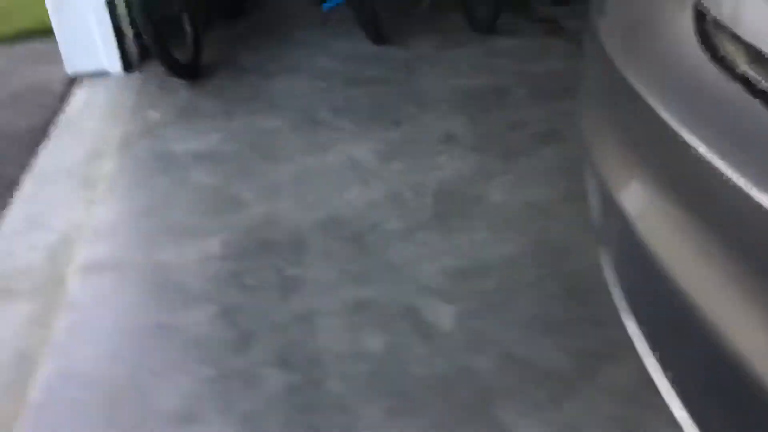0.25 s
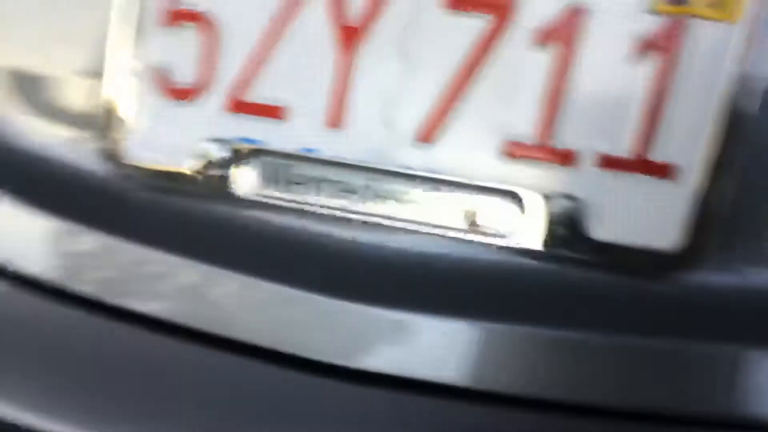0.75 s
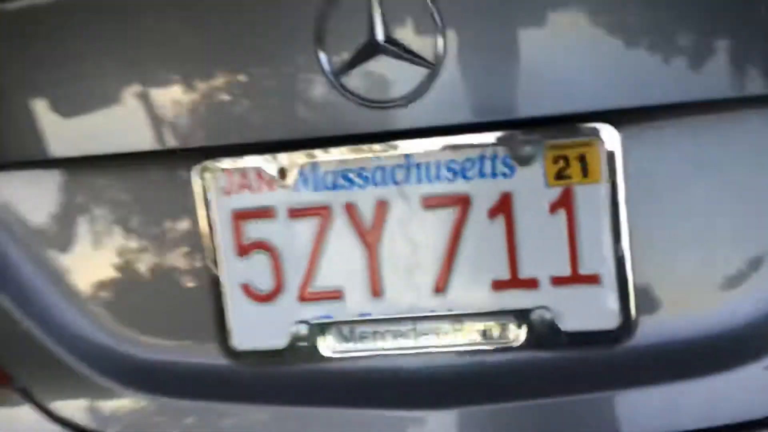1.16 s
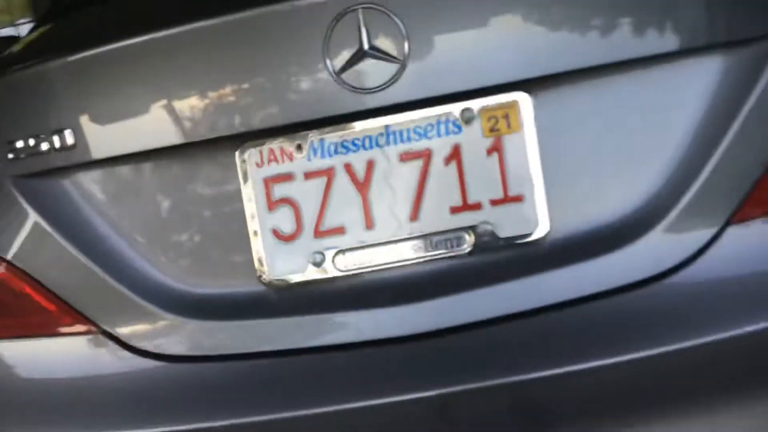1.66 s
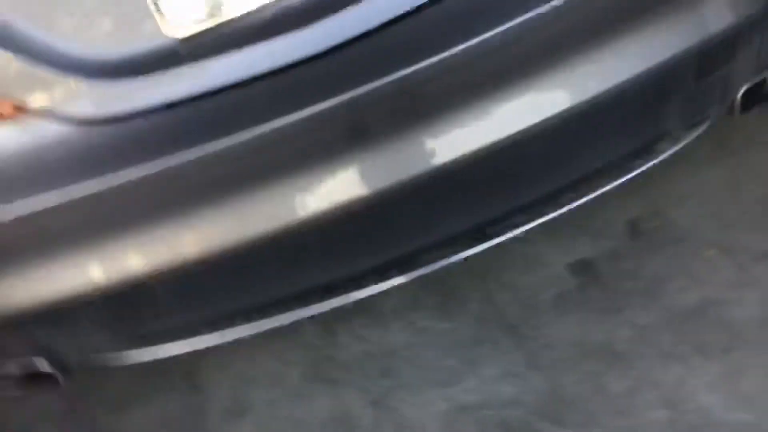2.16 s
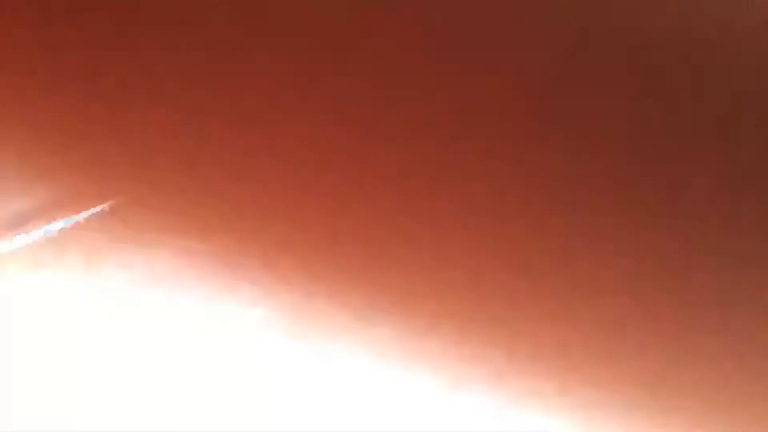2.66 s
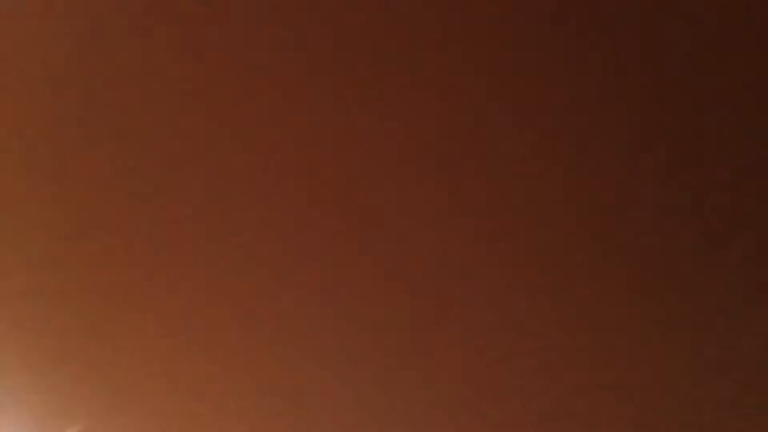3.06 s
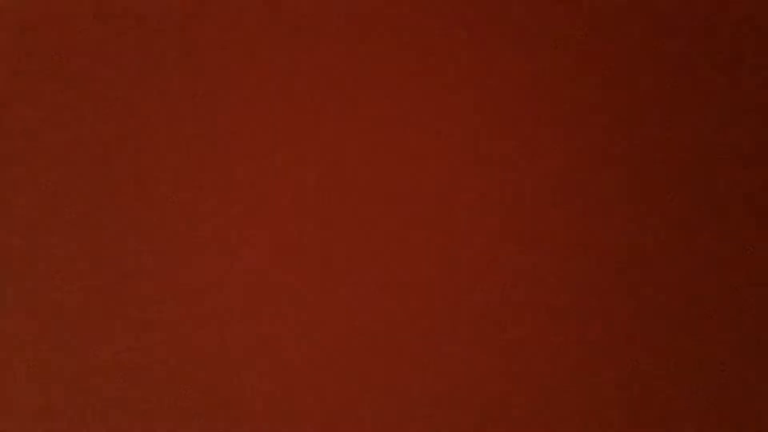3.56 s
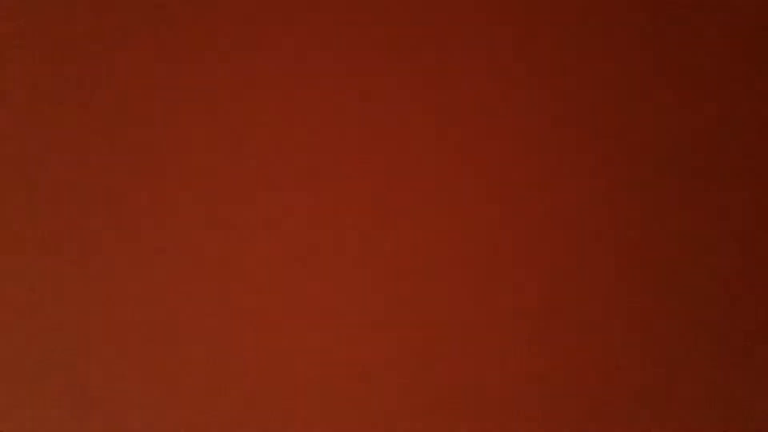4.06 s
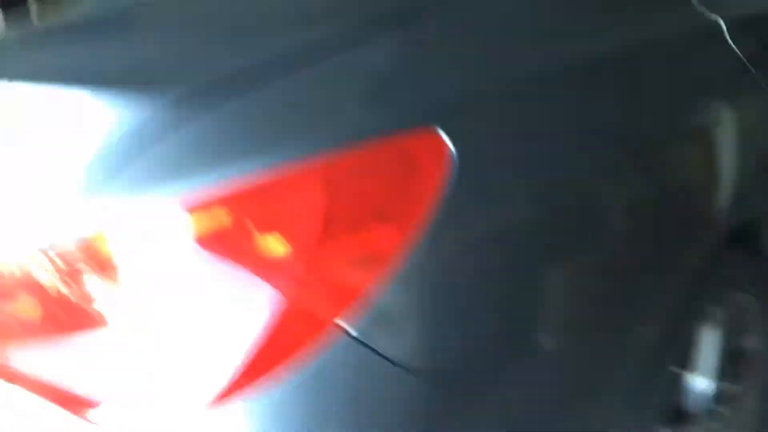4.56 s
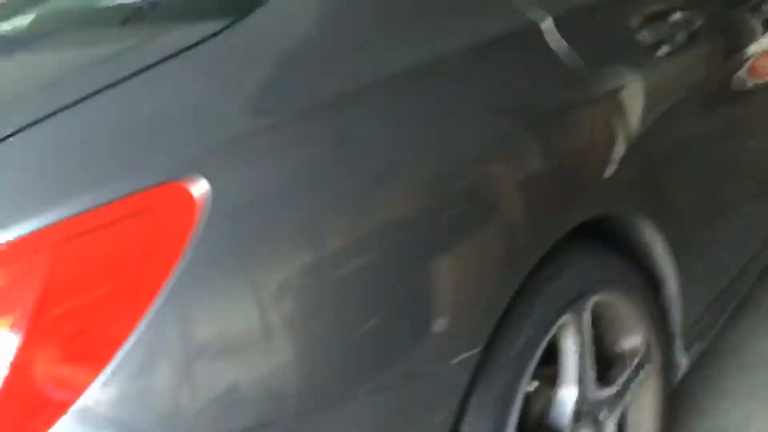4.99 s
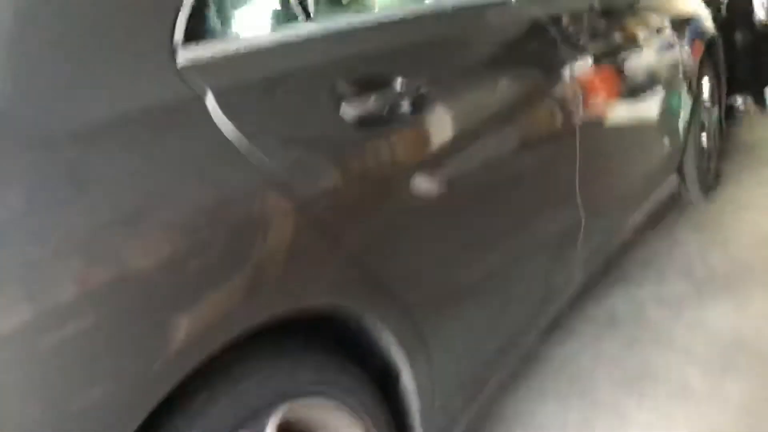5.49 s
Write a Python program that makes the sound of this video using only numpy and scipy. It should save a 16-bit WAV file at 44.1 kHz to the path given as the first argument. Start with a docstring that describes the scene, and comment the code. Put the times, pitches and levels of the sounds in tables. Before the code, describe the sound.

A faint hollow hinge rub leads into a car trunk lid slamming at about half a second: sharp metal latch clack, deep body thud and a quick rattle of loose trim. The garage rings briefly. Afterwards, a hand shifts on the handheld microphone, giving close, quiet rasps, low bumps and small plastic ticks over a low hush.

```python
"""Trunk lid slammed in a garage

A car's trunk lid swings down on rubbing hinges and slams: filtered noise bursts for the latch, dying
sines for the panels and body, fainter bursts for loose trim, and a noise tail for the garage around it.
Right at the microphone, mostly after the slam, the hand holding the camera shifts its grip: fingers and
palm are showers of tiny slips, bumps are low cycles falling in pitch, ticks are damped bursts. Still air
lies below.
"""
import sys
import numpy as np
from scipy import signal
from scipy.fft import next_fast_len
from scipy.io import wavfile
from scipy.ndimage import uniform_filter1d

SR = 44100
rng = np.random.default_rng(int(sys.argv[2]) if len(sys.argv) > 2 else 0)


def output_pcm(signal):
    """Save a mono or channel-first signal as 16-bit PCM at the path in sys.argv[1].

    Samples are clipped to [-1, 1] before scaling.
    """
    pcm = np.clip(np.atleast_2d(signal).T, -1, 1) * 32767
    wavfile.write(sys.argv[1], SR, np.round(pcm).astype(np.int16))


N = 252693
TIME = np.arange(N) / SR  # s

# the lid's weight landing on the body, and its rebounds: start_s, relative level_db
LANDINGS = [(0.46, -2.5), (0.497, 5), (0.603, -6.5)]


def amp(db):
    """Decibels to gain."""
    return 10 ** (np.asarray(db) / 20)


def evened(x):
    """Scales to rms 1."""
    return x / np.sqrt(np.mean(x ** 2) + 1e-20)


def read(points, hz):
    """Reads a table along a log-frequency axis."""
    f, value = np.transpose(points)
    return np.interp(np.log(hz + 1), np.log(f + 1), value)


def add(mix, s, sound):
    """Mixes a sound in at time s."""
    part = mix[max(round(s * SR), 0):][:len(sound)]
    part += sound[:len(part)]


def level(rows):
    """Gain over time from rows of time and dB."""
    s, db = np.transpose(rows)
    return amp(np.interp(TIME, s, db))


def colour(x, points, tilt_db=0):
    """Causal filter with the given spectrum, tilted by tilt_db per octave about 1.5 kHz."""
    size = next_fast_len(len(x) + 4096)
    hz = abs(np.fft.fftfreq(size, 1 / SR))
    tilt = tilt_db * np.log2(np.maximum(hz, 300) / 1500)  # level below 300 Hz
    log_gain = np.log(amp(read(points, hz) + tilt))
    response = np.exp(np.conj(signal.hilbert(log_gain)))  # minimum phase
    return np.fft.ifft(np.fft.fft(x, size) * response).real[:len(x)]


def wander(x, depth_db):
    """Narrow patches of the spectrum swell and fade, as when a contact keeps moving."""
    z = signal.stft(x, nperseg=1024, noverlap=768)[2]
    patches = uniform_filter1d(rng.standard_normal(z.shape), size=4, axis=0)
    patches = evened(uniform_filter1d(patches, size=9, axis=1))
    return signal.istft(z * amp(depth_db * patches), nperseg=1024, noverlap=768)[1][:len(x)]


def resonate(x, hz, width_hz):
    """One resonance whose centre may move: shift down to zero, smooth, shift back."""
    turn = np.exp(2j * np.pi * np.cumsum(hz * np.ones(len(x))) / SR)
    r = np.exp(-np.pi * width_hz / SR)
    return (turn * signal.lfilter([1 - r], [1, -r], x / turn)).real


def ring(modes):
    """Dying sines, one for each mode, with alternating sign."""
    t = TIME[:SR]
    out = np.zeros(SR)
    for k, (hz, db, t60) in enumerate(modes):
        out += (-1) ** k * amp(db - 60 * t / t60) * np.sin(2 * np.pi * hz * t)
    return out


def strike(crack_t60, clatter_db, clatter_t60, rise_s, contact_db):
    """One sharp contact, then a crack of dense noise that dies into a clatter; each strike differs."""
    t = TIME[:SR // 3]
    decay = amp(-60 * t / crack_t60) + amp(clatter_db - 60 * t / clatter_t60)
    shape = decay * (1 - np.exp(-t / rise_s))
    sound = shape * evened(wander(rng.standard_normal(len(t)), depth_db=3.5))
    add(sound, rise_s, [amp(contact_db)])  # a single-sample click
    return sound


def friction(points, per_s, spread_db, flutter_db, patchy_db):
    """Many tiny slips of uneven size, coming in clumps, coloured by what they shake."""
    slips = rng.choice([-1, 1], N) * (rng.random(N) < per_s / SR)
    slips = slips * amp(spread_db * np.minimum(rng.exponential(1, N), 4))
    clumps = uniform_filter1d(rng.standard_normal(N), size=400)
    clumps = evened(uniform_filter1d(clumps, size=300))
    return evened(colour(wander(slips, patchy_db) * amp(flutter_db * clumps), points))


def latch(panel_t60=0.47, spread_s=0.032):
    """Blows on steel, each coloured by the part it lands on; the strongest sets the panels ringing."""
    # seal, striker and latch meeting: start_s, relative level_db, hardness_db_per_octave, part_hz
    blows = [(0.367, -26.5, -7, 888), (0.451, -23.5, -6.5, 769), (0.459, -19.5, -7.5, 942),
             (0.464, -15.5, -2, 710), (0.474, -8.5, -0.5, 1304), (0.479, 3.5, -1.5, 2300),
             (0.485, -9.5, -3.5, 1284), (0.494, -6, -3.5, 790), (0.510, -3.5, 3, 3780),
             (0.517, -2.5, -2.5, 940), (0.534, -8.5, -2, 1300), (0.539, -4.5, 0, 1295),
             (0.546, -1.5, 0.1, 3880)]
    # colour of a blow on steel: frequency_hz, level_db
    steel = [(60, -19.5), (170, -22.5), (245, -1), (400, -2), (490, -4), (750, 2.5), (1050, -5),
             (1300, 1.5), (1700, -6), (2900, -7.5), (4500, -9), (7000, -19), (11000, -21), (16000, -26)]
    # ringing of the lid's panels: pitch_hz, relative level_db
    panel_modes = [(244, 5), (338, 6), (411, 3), (658, -3), (727, 3), (826, 2), (860, -2), (893, -3),
                   (973, -3), (1126, 1), (1180, -6), (1270, -3), (1292, -1), (1331, 0), (2574, -8),
                   (4171, -7), (4760, -13)]
    out = np.zeros(N)
    for s, db, hardness_db, hz in blows:
        blow = strike(crack_t60=0.062, clatter_db=-13, clatter_t60=0.18, rise_s=0.0006, contact_db=14.5)
        blow = colour(blow, steel, hardness_db)
        part = resonate(blow, hz, 0.38 * hz)
        add(out, s, amp(db - 8) * (blow + amp(-4.5) * part))
    s, db, *_ = max(blows, key=lambda row: row[1])
    panels = ring([(hz, mode_db, panel_t60) for hz, mode_db in panel_modes])
    spreading = 1 - np.exp(-TIME[:SR] / spread_s)
    add(out, s, amp(db - 34) * panels * spreading)
    return out


def boom(rise_s=0.011, thud_t60=0.22):
    """The lid squeezes the seal and the trapped air: a dull thud and the low modes of the body."""
    # the body and the air in the trunk: pitch_hz, relative level_db, t60_s
    body_modes = [(59, 3.5, 0.33), (79.5, -5, 0.88), (90, -8, 0.99), (118.6, 7, 0.31), (158.4, -11.5, 0.17),
                  (239.7, -9.5, 0.22)]
    # frequency_hz, level_db
    dull = [(25, -54.5), (55, 10.5), (130, 4.5), (280, -3.5), (450, -11), (1200, -60.5)]
    t, out = TIME[:SR], np.zeros(N)
    for s, db in LANDINGS:
        thud = evened(colour(rng.standard_normal(SR), dull)) * amp(-60 * t / thud_t60)
        body = amp(-31) * ring(body_modes) + amp(-17) * thud
        add(out, s, amp(db) * body * (1 - np.exp(-t / rise_s)))
    return out


def trim():
    """The number plate and trim chatter against the shaking lid: a run of short strikes."""
    # loose parts knocking: start_s, relative level_db, hardness_db_per_octave
    rattles = [(0.569, -10, -7), (0.582, -8.5, 3.5), (0.600, -11, 1), (0.613, -17, 0.5),
               (0.643, -12.5, 1.5), (0.651, -21, -2), (0.677, -12.5, 1.5), (0.709, -19, 0),
               (0.7412, -14, 0.5), (0.772, -30, -1), (0.804, -24, -0.5), (0.838, -30, 2),
               (0.864, -24.5, -.5), (0.896, -27.5, -1), (0.93, -32, -4.5), (0.959, -32.5, -3.5)]
    # colour of the loose parts: frequency_hz, level_db
    trim_colour = [(100, -3), (250, -2.5), (380, -4.5), (520, -8), (780, 7), (1050, 0.5), (1330, -2),
                   (1600, -7.5), (2500, -7), (3200, -8), (4300, -11.5), (5500, -14), (7000, -27),
                   (16000, -34)]
    out = np.zeros(N)
    for s, db, hardness_db in rattles:
        knock = strike(crack_t60=0.034, clatter_db=-14, clatter_t60=0.33, rise_s=0.00071, contact_db=11.5)
        add(out, s, amp(db - 9.5) * colour(knock, trim_colour, hardness_db))
    return out


def hinge(sing_hz=705, sing_width_hz=48):
    """The hinges rub and sing hollowly as the lid comes down, and stop when it lands."""
    # the lid swinging on its hinges: time_s, relative level_db
    swing = [(0, -42), (0.06, -73), (0.13, -81), (0.17, -55.5), (0.3, -44.5), (0.362, -45), (0.372, -36),
             (0.41, -44.5), (0.44, -46.5)]
    # colour of the rubbing: frequency_hz, level_db
    hinge_colour = [(60, -29.5), (190, 2.5), (300, -8.5), (480, -11.5), (615, -2), (760, -6), (850, -9.5),
                    (1150, -9.5), (1600, -19.5), (2700, -23.5), (6000, -41.5), (16000, -51)]
    rub = friction(hinge_colour, per_s=4500, spread_db=2.0, flutter_db=1.0, patchy_db=1.0)
    sing = resonate(rng.standard_normal(N), sing_hz, sing_width_hz)
    sing = evened(resonate(sing, sing_hz, sing_width_hz))
    moving = TIME < LANDINGS[0][0]
    return level(swing) * moving * (amp(-3.0) * rub + amp(-5) * sing)


def stroke(length_s, fastest):
    """A finger lands, speeds up, slows and lifts: its speed, and the loudness that follows it."""
    land_s, lift_s = 0.004, 0.016
    edge_speed, arch = 0.23, 1.85  # share of top speed at both ends; sharpness of the arch between
    t = TIME[:round((length_s + lift_s) * SR)]
    phase = np.interp(t / length_s, [0, np.clip(fastest, 0.05, 0.95), 1], [0, 0.5, 1])
    speed = edge_speed + (1 - edge_speed) * abs(np.sin(np.pi * phase)) ** arch
    touch = np.minimum(t / land_s, 1) * np.minimum((t[-1] - t) / lift_s, 1)
    return speed, speed * touch


def fingers(hollow_growth=0.78, scrape_width_hz=1100, scrape_glide=0.57, rest_db=-70.5):
    """Sliding skin rasps and fizzes, with a scrape that rises with speed; gentle strokes sound hollower."""
    # finger strokes over the case: start_s, length_s, fastest point as a share of the length,
    # relative rasp level_db, fizz_db relative to the rasp, scrape pitch_hz at top speed
    strokes = [(0.0, 0.15, 0.51, -57.5, -7, 3220), (0.17, 0.099, 0.45, -50, -8.5, 2900),
               (0.753, 0.12, 0.29, -59, -2, 3070), (1.07, 0.19, 0.32, -70.5, -4, 3500),
               (1.216, 0.13, 0.88, -66, -9.5, 2500), (1.593, 0.048, 0.29, -65.5, -7, 3700),
               (1.787, 0.097, 0.57, -69.5, -8, 2500), (1.911, 0.066, 0.48, -51, -12.5, 1786),
               (2.0, 0.17, 0.65, -45, -4.5, 1250), (2.135, 0.14, 0.76, -45.5, -6, 895),
               (2.236, 0.073, 0.93, -41.5, -21, 3100), (2.324, 0.17, 0.17, -66.5, -10, 3020),
               (2.598, 0.17, 0.72, -45, -11.5, 1860), (2.773, 0.25, 0.48, -59.5, -17, 1200),
               (3.122, 0.096, 0.6, -50, -10, 4200), (3.212, 0.15, 0.1, -66.5, -6, 3000),
               (3.493, 0.092, 0.89, -52.5, -18, 1500), (3.576, 0.072, 0.36, -54, -12, 1600),
               (3.625, 0.17, 0.13, -62, -32, 2430), (3.784, 0.2, 0.26, -64.5, -12, 2430),
               (3.982, 0.11, 0.093, -61.5, -9, 2540), (4.106, 0.11, 0.15, -50.5, -18, 2400),
               (4.247, 0.074, 0.82, -55, -5.5, 1200), (4.348, 0.11, 0.36, -47, -12, 2850),
               (4.447, 0.15, 0.42, -41, -8, 2650), (4.683, 0.053, .4, -64, -12, 2000),
               (4.777, 0.27, 0.41, -68.5, -13, 3400), (5.183, 0.058, 0.28, -63.5, -2, 2780),
               (5.234, 0.12, 0.14, -55, -11, 2880), (5.426, 0.072, 0.73, -62, -20, 1200),
               (5.655, 0.041, 0.71, -44.5, -12.5, 3280), (5.687, 0.067, .3, -60, -0.5, 3070)]
    # colours of the rasp, the hollow rub and the fizz: frequency_hz, level_db
    rasp_colour, hollow_colour, fizz_colour = [(300, -25), (700, 0), (1200, 2), (1800, -2), (2800, -1),
                                               (3600, -1.5), (4700, -5), (6200, -12.5), (7500, -16.5),
                                               (10000, -24.5)], [(150, -26.5), (350, -2), (480, -5.5),
                                                             (650, -0.5), (900, -16), (1400, -15),
                                                             (2500, -21.5), (6000, -53)], [(4000, -7), (6500, -6),
                                                                             (7700, -5), (8600, -1.5),
                                                                             (11000, -6.5), (16000, -12)]
    scrape_colour = [(300, -6.5), (700, -1.5), (4500, -1.5), (8000, -18.5)]
    rasp_gain, fizz_gain, pitch_sum = np.zeros((3, N))
    for s, length_s, fastest, db, fizz_db, hz in strokes:
        speed, loudness = stroke(length_s, fastest)
        add(rasp_gain, s, amp(db) * loudness)
        add(fizz_gain, s, amp(db + fizz_db) * loudness)
        add(pitch_sum, s, amp(db) * loudness * hz * speed ** scrape_glide)
    scrape_hz = pitch_sum / (rasp_gain + 1e-12)  # where strokes overlap, the louder weighs more
    slips = friction(scrape_colour, per_s=2200, spread_db=1.5, flutter_db=0.0, patchy_db=4.0)
    scrape = amp(-1.0) * rasp_gain * evened(resonate(slips, scrape_hz, scrape_width_hz))

    rub_gain = rasp_gain + amp(rest_db)  # the grip is never quite still
    rasp = friction(rasp_colour, per_s=11000, spread_db=3.5, flutter_db=2.2, patchy_db=2.5)
    rasp = amp(-3.5) * rub_gain * rasp
    hollow = friction(hollow_colour, per_s=1600, spread_db=4.5, flutter_db=-2.0, patchy_db=5.0)
    hollow = amp(-14.5) * rub_gain ** hollow_growth * hollow
    fizz = friction(fizz_colour, per_s=30000, spread_db=4.0, flutter_db=1.7, patchy_db=2.5)
    fizz = amp(-2.5) * fizz_gain * fizz
    return rasp + scrape + hollow + fizz


def bumps(start=1.95, end=0.67, fall_cycles=0.91, swell_cycles=0.79, flex=0.491, flex_db=-15):
    """Each bump gives a few low cycles; the small microphone's bass cut smears them into a falling pitch;
    the case flexes back slower."""
    # fingers bumping the case: start_s, relative level_db, nominal pitch_hz (start, end and flex multiply it)
    touches = [(1.046, -40, 102.0), (1.085, -44, 200), (1.232, -39, 274), (1.572, -36, 221.4),
               (1.606, -34, 148), (1.815, -40, 226), (1.932, -21, 225), (1.957, -14, 112),
               (1.991, -27, 116), (2.013, -29, 73), (2.3, -33.5, 328), (2.65, -26.5, 212),
               (2.83, -35.5, 83.7), (2.892, -22.5, 190), (2.915, -25.5, 170), (3.12, -35.5, 207),
               (3.284, -36.5, 233), (3.611, -30.5, 226), (3.668, -32.5, 142), (3.804, -31, 246),
               (3.819, -30.5, 249), (3.973, -35, 213), (4.057, -34, 208), (4.167, -21, 133),
               (4.188, -24.5, 127), (4.247, -25.5, 192), (4.329, -40, 93), (4.359, -31, 230),
               (4.456, -32, 204), (4.622, -39, 132), (4.689, -47, 225), (4.789, -35, 205),
               (4.954, -45, 210), (5.084, -36.5, 290), (5.339, -37, 205), (5.421, -42, 220.0),
               (5.466, -36.5, 187), (5.492, -45, 180), (5.529, -42.5, 240), (5.586, -33.5, 298)]
    t, out = TIME[:SR // 6], np.zeros(N)
    for s, db, hz in touches:
        cycles = hz * t
        pitch_hz = hz * (end + (start - end) * np.exp(-cycles / fall_cycles))
        u = cycles / swell_cycles
        push = u * np.exp(1 - u) * np.sin(2 * np.pi * np.cumsum(pitch_hz) / SR)
        v = cycles * flex / 1.7
        flex_back = v ** 2 * np.exp(2 - 2 * v) * np.sin(2 * np.pi * flex * cycles)
        add(out, s, amp(db - 2.5) * (push + amp(flex_db) * flex_back))
    return out


def ticks(damping=0.83, contact=1.54):
    """The case slips at a seam: a short burst shakes a heavily damped resonance, with a thin snap on top."""
    # the case under the grip: start_s, relative level_db, centre_hz, decay time constant_s,
    # snap_db relative to the body
    slips = [(1.231, -40.5, 797.0, 0.00037, -32), (1.266, -45.5, 788, 0.0013, -25),
             (1.572, -41, 870, 0.00041, -5.5), (1.815, -39, 788, 0.0024, -32.5),
             (1.919, -33, 1750, 0.0022, -27), (1.952, -33, 1190, 0.0012, -24),
             (1.981, -47, 1330.0, 0.00055, -5), (1.984, -30.5, 690, 0.0026, -38),
             (2.523, -33.5, 1220, 0.0013, -48), (2.568, -42.5, 1310.0, 0.00073, -31),
             (2.605, -38.5, 1060, 0.00088, -29), (2.645, -32, 804, 0.0044, -26),
             (2.786, -43, 807.0, 0.0017, -28), (2.893, -38.5, 740, 0.0019, -3),
             (3.116, -44.5, 714, 0.0013, -30), (3.226, -34.5, 1380.0, 0.001, -25),
             (3.349, -46.5, 935, 0.002, -30), (3.5127, -23, 1680, 0.0021, -12.5),
             (3.6085, -35, 1000, 0.0028, -37), (3.6305, -23.5, 1450, 0.002, -25),
             (3.653, -41.5, 2310, 0.019, -24), (3.792, -30, 1580, 0.0015, -38),
             (4.098, -45, 4040, 0.00085, 2), (4.1127, -28, 2280, 0.0033, -10),
             (4.166, -21.5, 2220, 0.00094, -26), (4.2463, -28, 1410, 0.0029, -31),
             (4.305, -29, 1020, 0.0032, -13.5), (4.467, -45, 1840.0, 0.0027, -36),
             (4.556, -32, 1680, 0.0021, -22), (4.792, -45.5, 1360, 0.014, -26),
             (4.858, -43.5, 2160, 0.0038, -32), (5.088, -39.5, 990, 0.00436, -35),
             (5.419, -30.5, 1610, 0.00076, -29), (5.579, -45.5, 1230.0, 0.00082, -21),
             (5.582, -38, 2200, 0.0014, -34)]
    # frequency_hz, level_db
    body_colour = [(150, -20.5), (500, 12.5), (1200, 3.5), (3300, -1.0), (6000, -9), (8000, -14), (16000, -30)]
    snap_colour = [(2000, -35), (6000, -6.5), (11000, -14.5), (16000, -11.5)]
    t, out = TIME[:2048], np.zeros(N)
    for s, db, hz, decay_s, snap_db in slips:
        burst = rng.standard_normal(len(t)) * np.exp(-t / decay_s)
        add(burst, decay_s / 2, [contact])  # a single-sample click
        body = resonate(colour(burst, body_colour), hz, damping * hz)
        snap = colour(burst, snap_colour)
        tick = body / abs(body).max() + amp(snap_db) * snap / abs(snap).max()
        add(out, s, amp(db + 2) * tick)
    return out


def palm(squeeze_s=0.013, relax_s=0.018, rest_db=-63.5):
    """Each squeeze rises, holds and relaxes; the creeping skin rumbles through the case."""
    # the palm squeezing the case: start_s, length_s, relative level_db
    presses = [(0.0, 0.031, -52), (0.185, 0.3, -58), (1.287, 0.17, -58.5), (1.83, 0.12, -53),
               (1.992, 0.1, -41.5), (2.18, 0.14, -49), (2.51, 0.072, -52), (2.6, 0.16, -46),
               (2.78, 0.19, -52), (2.883, 0.091, -47), (3.114, 0.11, -45.5), (3.447, 0.18, -48),
               (3.6, 0.11, -46.5), (3.8, 0.11, -46), (4.045, 0.087, -47), (4.141, 0.16, -43.5),
               (4.344, 0.065, -43), (4.477, 0.15, -48), (4.665, 0.074, -43), (4.814, 0.041, -46),
               (4.953, 0.038, -47.5), (5.239, 0.02, -45.5), (5.443, 0.089, -50), (5.65, 0.042, -65)]
    # colour of the rumble: frequency_hz, level_db
    palm_colour = [(25, -31), (60, 0), (120, 2), (170, 1.5), (240, 1), (340, -4), (450, -14), (650, -12.5),
                   (1200, -26), (3000, -50)]
    t, pressure = TIME[:SR], np.zeros(N)
    for s, length_s, db in presses:
        release = np.exp(-np.maximum(t - length_s, 0) / relax_s)
        add(pressure, s, amp(db) * np.minimum(t / squeeze_s, 1) * release)
    creep = friction(palm_colour, per_s=900, spread_db=2.5, flutter_db=1, patchy_db=4.0)
    return amp(2.0) * np.hypot(pressure, amp(rest_db)) * creep  # never quite still


def garage(x, build_s=0.0086):
    """Dense reflections from concrete and walls: a noise tail with its own decay at each frequency."""
    # reverberation of the garage: frequency_hz, t60_s
    decay = [(60, 1.13), (250, 0.97), (1000, 0.78), (4000, 0.29), (8000, 0.45), (16000, 0.089)]
    hz, t, z = signal.stft(rng.standard_normal(SR * 3 // 2), SR, nperseg=256)
    tail = signal.istft(z * amp(-60 * t / read(decay, hz)[:, None]), SR, nperseg=256)[1]
    tail *= np.minimum(TIME[:len(tail)] / build_s, 1) ** 2
    return signal.fftconvolve(x, tail / np.linalg.norm(tail))[:N]


def still_air():
    """The steady hush of the place: coloured noise, strongest in the bass."""
    # colour of the hush: frequency_hz, level_db
    air_colour = [(15, -60.5), (25, -4.5), (108, 4.5), (229, -6.5), (463, -12.5), (659, -12), (1840, -31),
                  (3720, -30.5), (7510, -36), (14400, -42.5), (16000, -31.5)]
    return amp(-63) * evened(colour(rng.standard_normal(N), air_colour))


def scene():
    """The car in the garage, the hand right at the microphone, and still air."""
    lid, low, case = latch() + trim(), boom(), ticks()
    room = garage(amp(-20.0) * lid + amp(-12.5) * low + amp(-19) * case)
    car = hinge() + lid + low
    hand = case + bumps() + fingers() + palm()
    return (car + room + hand + still_air())[None]


def record(dry):
    """The small microphone loses the deepest bass; then the treble is cut off at the band limit."""
    thin = signal.sosfilt(signal.butter(4, 34, "high", fs=SR, output="sos"), dry)
    band_limit = signal.firwin(511, 15900, window=("kaiser", 9), fs=SR)  # cutoff in Hz
    return signal.oaconvolve(thin, band_limit[None], "same")


dry = scene()
out = record(dry)
output_pcm(out)
```